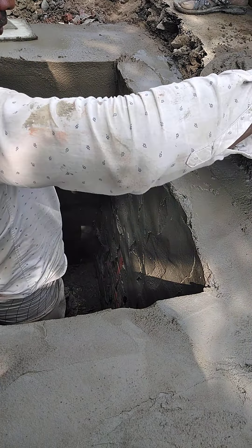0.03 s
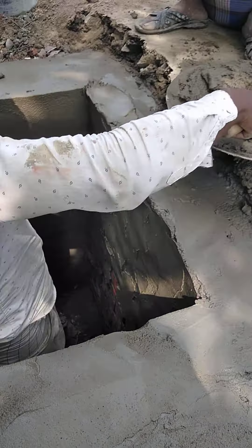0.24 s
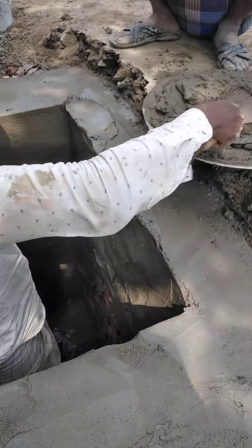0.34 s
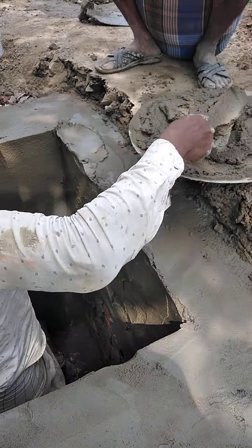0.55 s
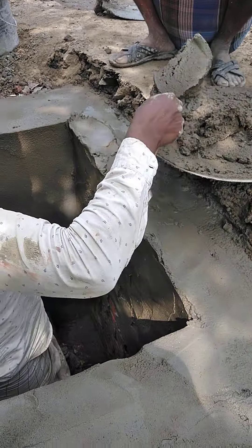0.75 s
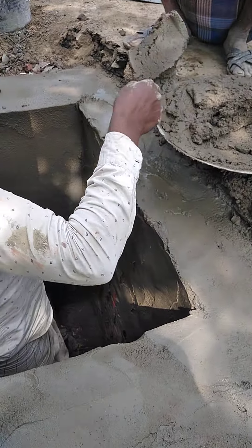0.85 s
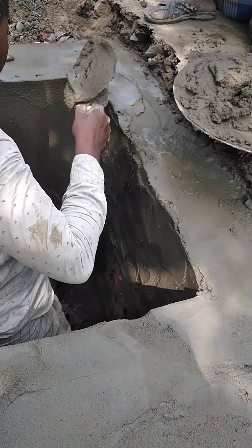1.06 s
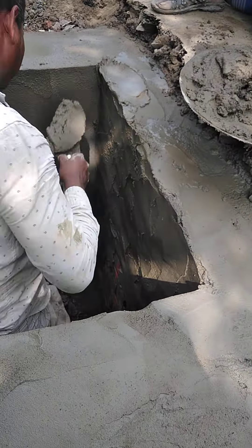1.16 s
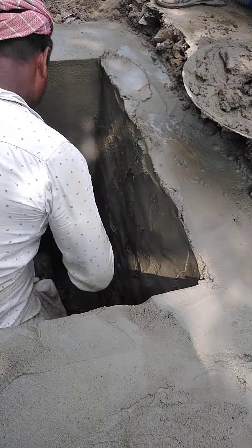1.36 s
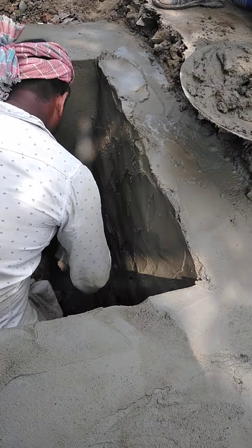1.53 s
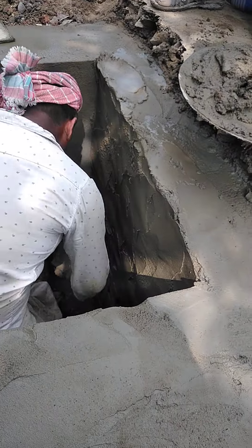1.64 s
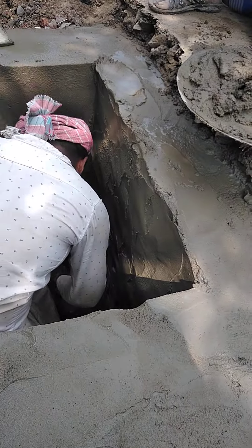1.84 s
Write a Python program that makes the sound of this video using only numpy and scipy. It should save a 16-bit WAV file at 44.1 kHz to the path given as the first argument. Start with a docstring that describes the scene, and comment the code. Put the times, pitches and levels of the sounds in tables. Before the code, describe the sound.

Close by, a trowel grinds through sandy mortar and makes the metal pan ring. A light clink and a few quieter rasps follow as it plasters a wall, with faint bird chirps and a low outdoor rumble behind.

```python
"""In a shallow pit outdoors, a steel trowel scoops wet mortar from a metal pan and spreads it on the wall.
Sand grinds between blade and pan and makes them ring; coarse grains crack, and sand crackles as the
load tears free. The trowel lifts with a light clink, then makes four soft, gritty strokes on the wall.
Behind it are a low rumble, a far drone, a few bird calls and faint, thin, steady whistling tones."""
import sys
import numpy as np
from scipy import signal
from scipy.fft import rfft, irfft
from scipy.io import wavfile

SR = 44100
rng = np.random.default_rng(int(sys.argv[2]) if len(sys.argv) > 2 else 0)


def transcribe(u):
    """Save the signal u as a 16-bit wav file named by the first command-line argument.

    u: samples, shape (n,) or (channels, n), limited to [-1, 1]; the rate is SR.
    q: integer samples, one column per channel.
    """
    v = np.clip(np.atleast_2d(u).T, -1, 1)
    q = np.round(v * 32767).astype(np.int16)
    wavfile.write(sys.argv[1], SR, q)


N = 83790
T = np.arange(N) / SR

JUDDER_HZ, PATCHY_DB = 100, 3   # how fast the grinding flickers; how much each band of it flickers
BITE_S = 0.015   # time a push takes to grow by 20 dB

# The notes at which pan and blade ring. Each row: pitch in Hz, width in Hz, level in dB.
PAN_NOTES = [(1902, 100, 1), (2180, 46, -2), (2320, 84, 3.5), (2427, 240, -1.5), (2600, 60, -3),
             (3200, 1200, -8), (3420, 43, -1.5), (3667, 140, -1.5), (3980, 290, 1), (4213, 190, 5.5),
             (4260, 240, -8.5)]
# The tone of sand under the blade. Each row: frequency in Hz, level in dB.
SAND_TONE = [(150, -52), (700, -21.5), (1600, -19.5), (2200, -4), (4300, 1), (6700, -3.5), (8500, -1.5),
             (10200, 3.5), (12300, -6.5), (15700, -18)]


def from_db(db):
    """Turn decibels into a number to multiply a sound by."""
    return 10 ** (np.asarray(db) / 20)


def rms_one(x):
    """Scale a signal so that its average power is 1."""
    return x / np.sqrt(np.mean(x ** 2) + 1e-20)


def drift(rate_hz):
    """A smooth random wobble, about 1 in size; a higher rate wobbles faster."""
    r = np.exp(-2 * np.pi * rate_hz / SR)
    return rms_one(signal.lfilter([1], [1, -2 * r, r * r], rng.standard_normal(2 * N))[N:])


def colour(x, tone):
    """Shape a sound's lows and highs along (Hz, dB) points; white noise keeps its power."""
    hz, db = np.transpose(tone)
    gain = from_db(np.interp(np.log(np.linspace(1, SR / 2, N + 1)), np.log(hz), db))
    cepstrum = irfft(np.log(rms_one(gain)))
    causal = np.r_[cepstrum[0], 2 * cepstrum[1:N]]   # so nothing sounds ahead of its cause
    return irfft(rfft(x, 2 * N) * np.exp(rfft(causal, 2 * N)))[:N]


def resonate(x, notes):
    """Make a sound ring at (Hz, width, dB) notes; wider notes die away sooner."""
    out, power = 0, 0
    for k, (hz, width, db) in enumerate(notes):
        r = np.exp(-np.pi * width / SR)
        b = (1 - r * r) / 2
        feedback = [1, -2 * r * np.cos(2 * np.pi * hz / SR), r * r]
        out += (-1) ** k * from_db(db) * signal.lfilter([b, 0, -b], feedback, x + 1e-18)
        power += b * from_db(db) ** 2
    return out / np.sqrt(power)


def swells(rows):
    """Loudness that rises to each peak and fades; rise and fade are the times for 20 dB."""
    return sum(from_db(db - 20 * (np.maximum(peak - T, 0) / rise) ** 2
                       - 20 * np.maximum(T - peak, 0) / fade) for peak, db, rise, fade in rows)


def grit(per_s, spread_db, judder_db):
    """Sand grains click at random, in clumps as the blade sticks and slips."""
    sizes = from_db(spread_db * np.minimum(rng.exponential(1, N), 4)) * rng.choice([-1, 1], N)
    clicks = sizes * (rng.random(N) < per_s / SR) / np.sqrt(per_s)
    return rms_one(clicks * from_db(judder_db * drift(JUDDER_HZ)))


def patchy(x):
    """Grains of different sizes crush in turn, so 20 frequency bands each swell and fade on their own."""
    spectrum, place = rfft(x, 2 * N), np.linspace(0, 20, N + 1)
    bands = (irfft(spectrum * np.maximum(1 - abs(place - k), 0))[:N] for k in range(20))
    return rms_one(sum(band * from_db(PATCHY_DB * drift(JUDDER_HZ)) for band in bands))


def echoes(x, fade_s):
    """Ground and walls throw back a duller wash of sound that drops 60 dB in fade_s."""
    dull_noise = signal.lfilter([1], [1, -.5], rng.standard_normal(N))
    tail = dull_noise * from_db(-60 * T / fade_s) * (T > .006)
    return signal.fftconvolve(x, tail / np.sqrt(np.sum(tail ** 2)))[:N]


def scoop():
    """Sand grinds between blade and pan: a ringing rasp, a hiss and the dull shove of the mortar."""
    # Pushes through the pan. Each row: start and end in seconds, ring and hiss levels in dB,
    # change along the push in dB, seconds to fade by 20 dB.
    pushes = [(0.0, 0.024, -54.5, -46, -5.5, 0.075), (0.212, 0.264, -40, -40.5, 10.5, 0.027),
              (0.281, 0.364, -14.5, -24, -10.5, 0.016), (0.38, 0.509, -59, -57, 4.5, 0.087),
              (0.54, 0.602, -53.5, -48.5, -7, 0.11)]
    # Shoves of the wet mortar. Each row: peak time in seconds, level in dB, rise and fade in seconds.
    shoves = [(0.292, -36, 0.027, 0.087), (0.352, -36, 0.02, 0.022), (1.87, -58, 0.028, 0.14)]
    # The dull tone of wet mortar. Each row: frequency in Hz, level in dB.
    mortar_tone = [(80, -37), (280, 0.5), (450, -11), (620, 0), (950, 4.5), (1200, -3.5), (1450, -2.5),
                   (2300, -39.5)]
    ring, hiss = 0, 0
    for start, end, ring_db, hiss_db, swell_db, fade in pushes:
        edges_db = -20 * np.maximum(np.maximum((start - T) / BITE_S, (T - end) / fade), 0)
        pressure = from_db(edges_db + np.interp(T, [start, end], [0, swell_db]))
        ring += from_db(ring_db) * pressure
        hiss += from_db(hiss_db) * pressure
    bite = np.minimum(hiss / from_db(-39), 1) ** 2   # a light blade catches fewer grains
    grains = patchy(grit(per_s=3700 + 8300 * bite, spread_db=2, judder_db=1))
    mortar = colour(grains * swells(shoves), mortar_tone)
    return resonate(grains * ring, PAN_NOTES) + colour(grains * hiss, SAND_TONE) + mortar


def background():
    """A steady outdoor rumble and a far drone that swells and sinks, both made of noise."""
    # The tones of the rumble and the drone. Each row: frequency in Hz, level in dB.
    rumble_tone = [(25, -22.5), (60, -4.5), (120, -0.5), (185, -5), (240, -12), (380, -15), (490, -36.5),
                   (1300, -44.5), (10500, -57), (13000, -75.5)]
    drone_tone = [(500, -43.5), (700, -10), (810, 4.5), (1000, 0.5), (1370, -57)]
    rumble = from_db(-49.5) * colour(rng.standard_normal(N), rumble_tone)
    drone = from_db(-61.5 + 4 * drift(7.8)) * colour(rng.standard_normal(N), drone_tone)
    return rumble + drone


def birds_and_whistles():
    """A few sliding bird calls and faint, thin, steady whistling tones; all waver a little and echo."""
    # The calls and tones. Each row: start and length in seconds, first and last pitch in Hz, level in dB.
    notes = [(0.02, 0.17, 4670, 4640, -64), (0.522, 0.24, 4560, 4450, -68.5),
             (0.587, 0.095, 2080, 2371, -60), (0.664, 0.039, 3230, 3330, -62.5),
             (0.701, 0.05, 3644, 2380, -47), (0.719, 0.047, 5530, 4960, -64.5),
             (0.728, 0.0269, 2460, 1950, -62.5), (0.99, 0.12, 744, 977, -50),
             (0.98, 0.14, 7030, 7105, -66.5), (1.192, 0.047, 2740, 2835, -69.5),
             (1.398, 0.089, 1208, 1452, -67.5), (1.465, 0.061, 3640, 3650, -61)]
    out = 0
    for start, length, first_hz, last_hz, db in notes:
        along = np.clip((T - start) / length, 0, 1)
        waver_hz = .008 * first_hz + .0039 * abs(last_hz - first_hz) / length   # more in a fast slide
        hz = first_hz * (last_hz / first_hz) ** along + waver_hz * drift(150)
        loudness = from_db(db) * np.sqrt(8 * along * (1 - along))
        out += loudness * np.sin(2 * np.pi * np.cumsum(hz) / SR)
    return out + from_db(-5.5) * echoes(out, fade_s=0.31)


def cracks(width_s=0.00079):
    """Each coarse grain crumbles in about a millisecond and sets the pan ringing."""
    # Grains breaking under the blade. Each row: time in seconds, level in dB.
    breaks = [(0.2849, -8.5), (0.2907, -7.5), (0.296, -15.5), (0.3059, -13), (0.3294, -20), (0.353, -21.5),
              (0.3609, -18)]
    # The tone of a breaking grain. Each row: frequency in Hz, level in dB.
    crunch_tone = [(200, -45.5), (1500, -12.5), (2300, 0), (4000, 4), (5300, -5.5), (10800, -9.5),
                   (14000, -31)]
    force = sum(from_db(db) * np.exp(-((T - at) / width_s) ** 2) for at, db in breaks)
    bursts = force * rng.choice([-1, 1], N)
    return colour(bursts, crunch_tone) + from_db(-5.5) * resonate(bursts, PAN_NOTES)


def crackles(width_s=0.0017):
    """Sand crackles in short, bright sprays as the load tears free."""
    # Sprays of sand. Each row: time in seconds, level in dB.
    sprays = [(0.4426, -47.5), (0.461, -44), (0.4744, -44), (0.598, -47)]
    force = sum(from_db(db) * np.exp(-((T - at) / width_s) ** 2) for at, db in sprays)
    return colour(force * patchy(rng.standard_normal(N)), SAND_TONE)


def clink(at_s=0.818, fade_s=0.029, width_hz=10.5):
    """A light, gritty touch as the trowel lifts: two ringing notes, plus a faint, very high tone."""
    # The clink's two notes and the very high tone. Each row: pitch in Hz, level in dB.
    notes = [(3360, 6), (6210, -7.5), (10300, -6)]
    touch = rng.standard_normal(N) * swells([(at_s, 0, BITE_S / 2, fade_s)])
    tones = resonate(touch, [(hz, width_hz, db) for hz, db in notes])
    return from_db(-59) * resonate(touch, PAN_NOTES) + from_db(-55.5) * tones


def blade_note(x, hz, width_hz=207):
    """One ringing note of the blade, filtered twice to keep it close to its pitch."""
    note = [(hz, width_hz, 0)]
    return resonate(resonate(x, note), note) * np.sqrt(2 * np.pi * width_hz / SR)


def spreading():
    """The blade rasps along the wall, and its notes take turns as the point of contact moves."""
    # Strokes on the wall. Each row: peak time in seconds, level in dB, rise and fade in seconds,
    # brightness in dB per octave, pitch multiplier for the loaded blade, rasp pitch in Hz.
    strokes = [(1.05, -53.5, 0.03, 0.12, 1, 0.94, 4650), (1.564, -45.5, 0.087, 0.14, -3.5, 0.95, 4050),
               (1.765, -65.5, 0.045, 0.089, 6, 0.94, 4640), (1.876, -52.5, 0.027, 0.16, -0.5, 0.89, 4720)]
    # The tone of grit on the wall. Each row: frequency in Hz, level in dB.
    wall_tone = [(200, -11.5), (380, 26.5), (520, -30), (1100, 2), (1700, 0.5), (5500, 9.5), (9400, -3),
                 (13000, -47)]
    # The notes of the blade held against the wall. Each row: base pitch in Hz, level in dB.
    notes = [(1040, 10), (1476, 3), (2220, 10.5), (3120, 3.5), (3670, 0), (4020, 3), (4350, -4.5),
             (5116, -3), (6130, 5.5), (7190, -16), (8260, -5), (9430, -6), (10700, -6), (11930, -7)]
    grain_spectrum = rfft(grit(per_s=7000, spread_db=0, judder_db=1), 2 * N)
    freq = np.linspace(0, SR / 2, N + 1)
    octaves = np.log2(np.maximum(freq, 500) / 4000)
    out = 0
    for *swell, brightness, tuning, rasp_hz in strokes:
        rasp_db = 5.5 * np.cos(2 * np.pi * np.maximum(freq / rasp_hz, .5))   # lifts multiples of rasp_hz
        grains = irfft(grain_spectrum * from_db(brightness * octaves + rasp_db))[:N]
        force = swells([swell]) * grains
        ring = sum(from_db(db + 2 * drift(14)) * blade_note(force, hz * tuning) for hz, db in notes)
        out += from_db(-8.5) * colour(force, wall_tone) + from_db(-18) * ring
    return out


def scene():
    """The trowel close by with a faint echo, and everything else behind it."""
    trowel = scoop() + cracks() + crackles() + spreading() + clink()
    echo = from_db(-22) * echoes(trowel, fade_s=0.26)
    return (trowel + echo + birds_and_whistles() + background())[None]


def record(dry):
    """An automatic volume control eases loud sounds down; the highest treble is cut off."""
    react_s, loud_db, cut_share, cutoff_hz = 0.013, -38, 0.21, 15700
    r = np.exp(-1 / (react_s * SR))
    level_db = 10 * np.log10(signal.lfilter([1 - r], [1, -r], dry ** 2) + 1e-12)
    eased = dry * from_db(-cut_share * np.maximum(level_db - loud_db, 0))
    return signal.sosfilt(signal.ellip(12, .1, 80, cutoff_hz, fs=SR, output="sos"), eased)


dry = scene()
out = record(dry)
transcribe(out)
```